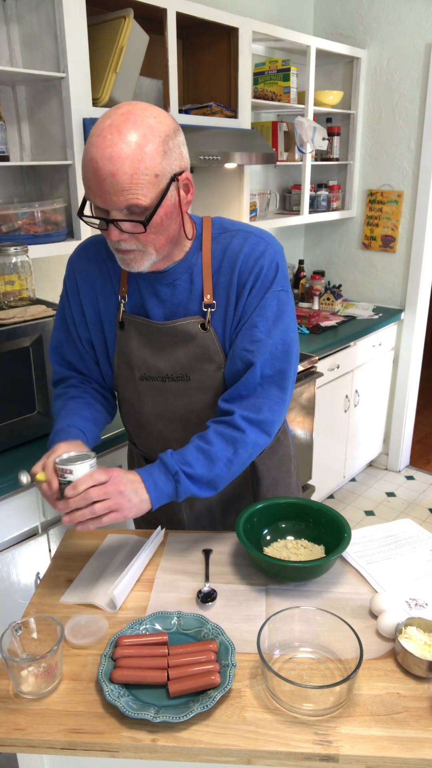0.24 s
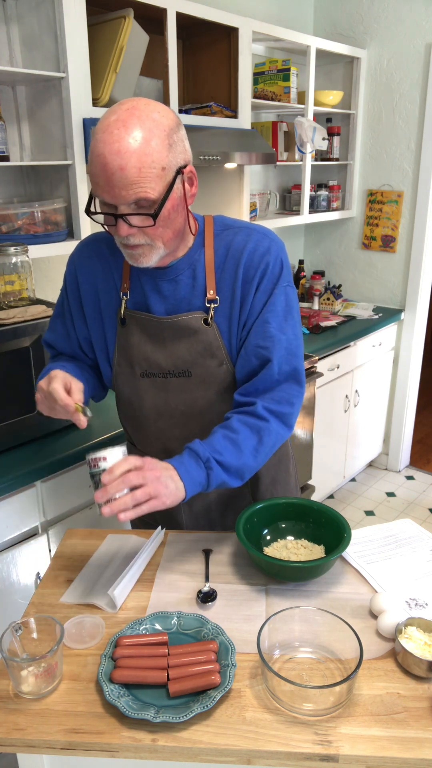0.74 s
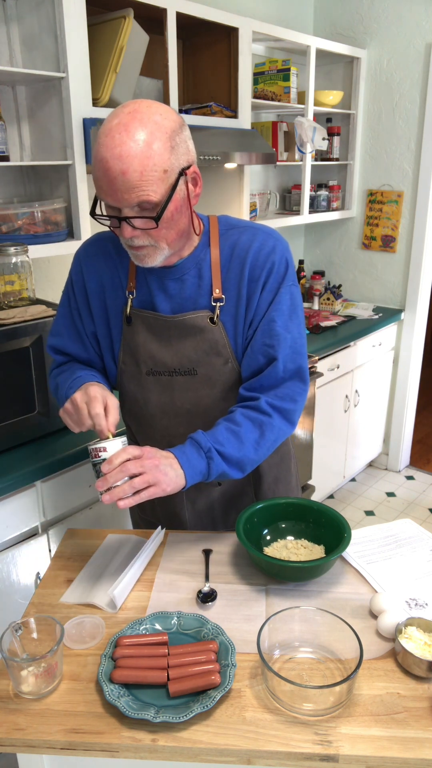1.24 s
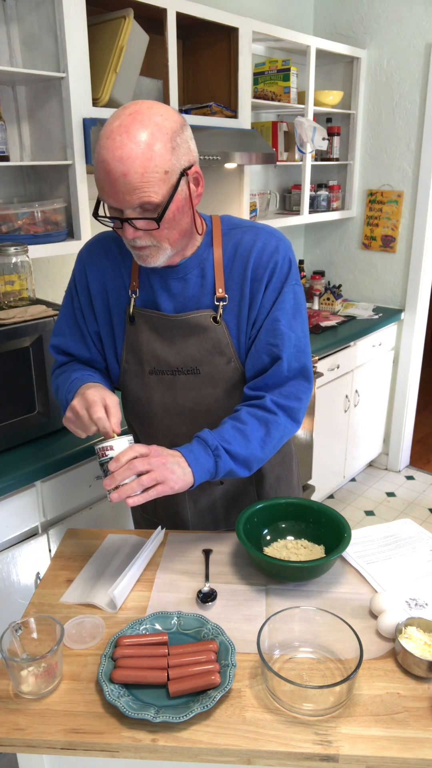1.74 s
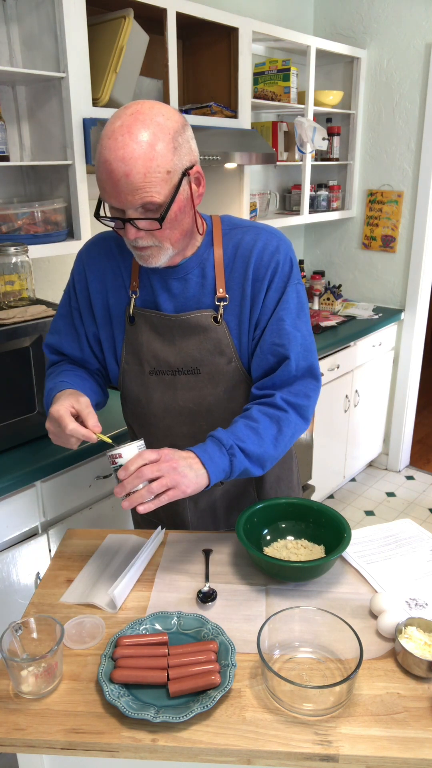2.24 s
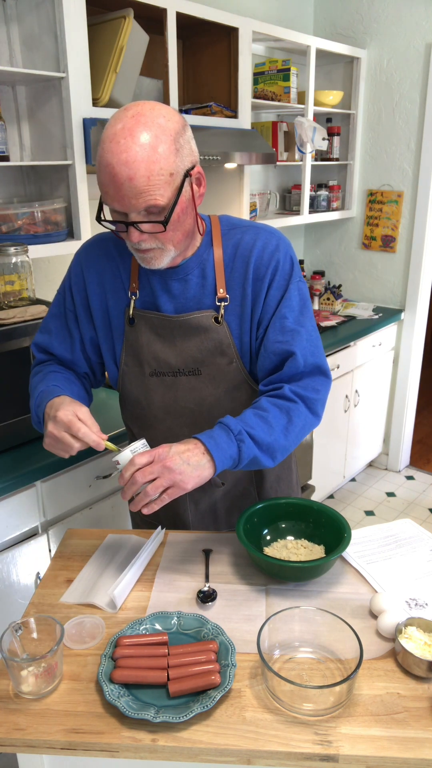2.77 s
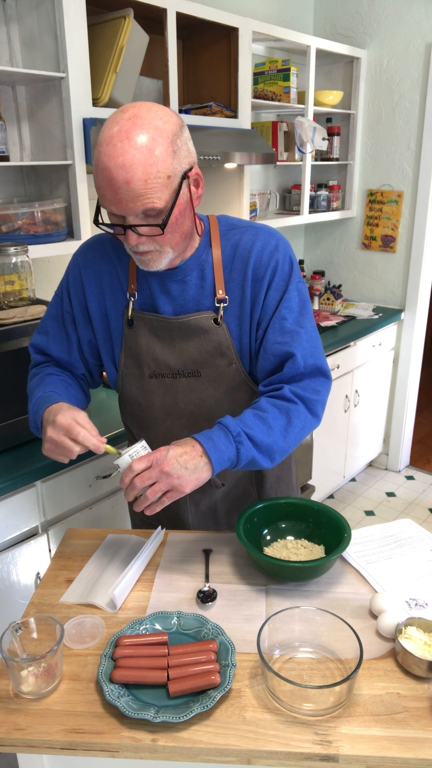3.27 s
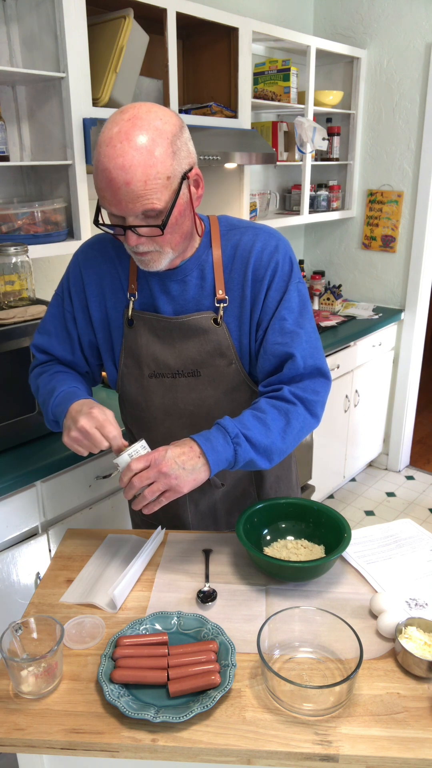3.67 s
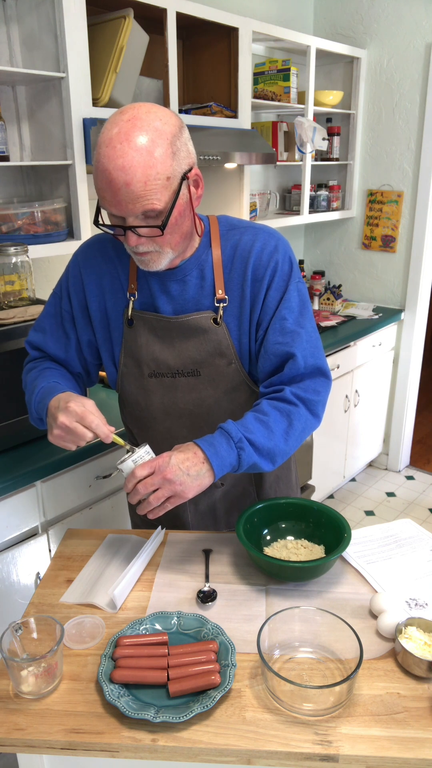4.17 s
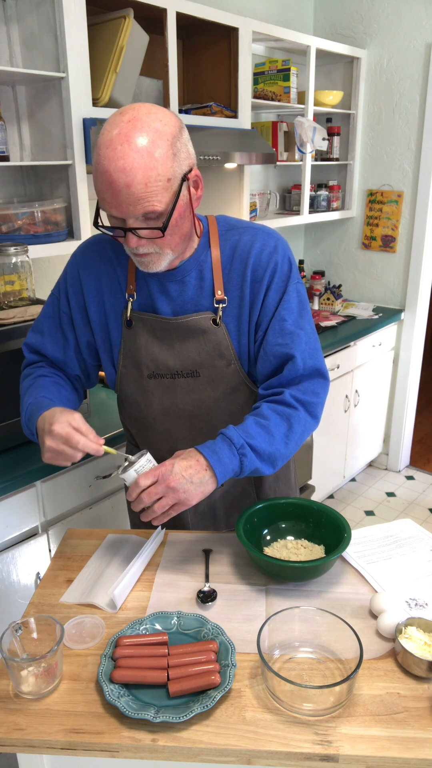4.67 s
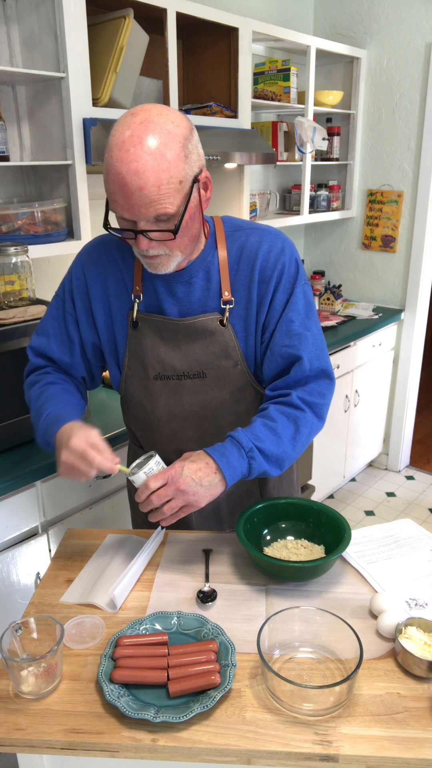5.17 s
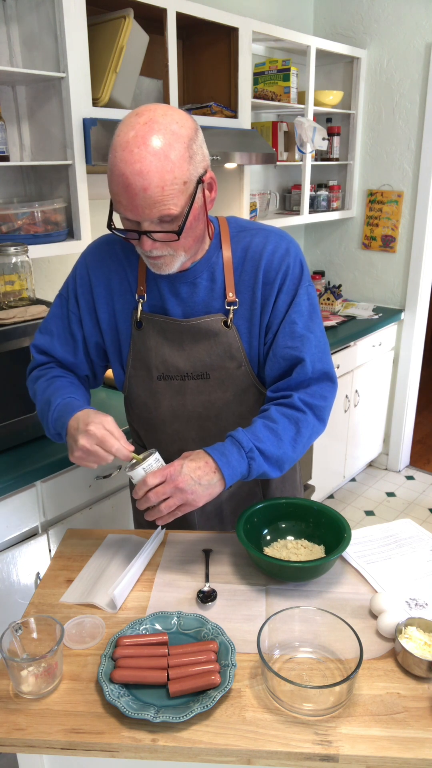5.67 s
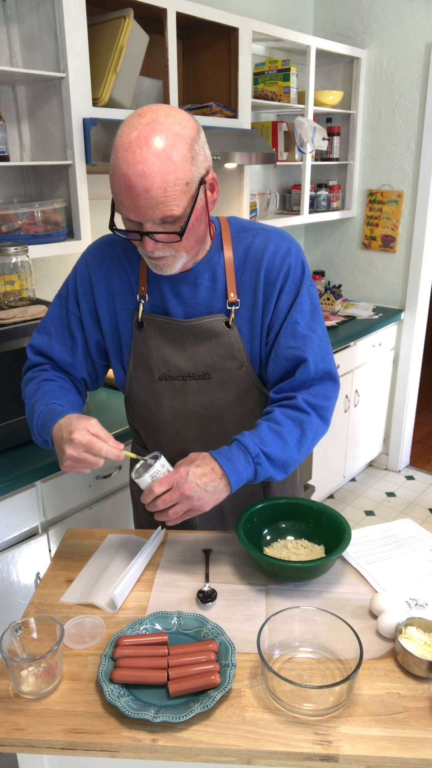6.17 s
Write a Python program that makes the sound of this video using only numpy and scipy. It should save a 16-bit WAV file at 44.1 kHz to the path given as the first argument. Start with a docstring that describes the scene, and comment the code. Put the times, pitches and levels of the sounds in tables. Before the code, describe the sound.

For the first 0.8 seconds, fingers twist the lid of a small metal can, with light rubbing and a run of little snaps. A faint tap and a soft hiss of powder follow just after 1 second. At about 1.6 seconds a measuring spoon knocks sharply on the can, the strongest click, then scrapes the bottom with a hollow tone and a brief squeak. From 2 to 3.4 seconds there is only low, steady room noise. A light tap starts more scraping and powder hiss, strongest and slightly squeaky near 3.8 seconds, then fading into faint rubs. Another sharp click comes at about 5.2 seconds, followed by taps and hollow, squeaky scrapes from 5.5 to 5.8 seconds. Soft scraping continues until about 6.4 seconds. The quiet kitchen adds a short echo throughout.

```python
"""In a quiet kitchen, fingers twist the lid of a small metal can until it lets go in little snaps.
Powder hisses as its grains shear. A measuring spoon then knocks on the can, ringing its damped modes,
and drags along the wall in tiny slips that excite the metal and the air inside, at times to a squeak.
It digs at the bottom, rubs the middle and ends at the top; the hard room reflects every sound."""
import sys
import numpy as np
from scipy import signal
from scipy.fft import rfft, irfft, next_fast_len
from scipy.io import wavfile

SR = 44100
rng = np.random.default_rng(int(sys.argv[2]) if len(sys.argv) > 2 else 0)


def to_wav(s):
    """Save 16-bit WAV."""
    ch = np.atleast_2d(s).T  # columns
    pcm = np.round(np.clip(ch, -1, 1) * 32767)  # PCM
    wavfile.write(sys.argv[1], SR, pcm.astype(np.int16))


N = 283122
TIME = np.arange(N) / SR

# Strokes of the spoon; the first row is instead a short press as the spoon settles after the first knock,
# letting the hollow note linger. Each row: part of the wall, time of full force, attack and hold in seconds,
# then relative levels in dB of the enclosed air, the wall's low band and its high band.
SPOON_STROKES = [("bottom", 1.074, 0.011, 0.0097, -54.5, -72, -64),
                 ("bottom", 1.615, .02, .025, -57, -63, -46),
                 ("bottom", 1.72, .075, .025, -29.5, -32.5, -31.5),
                 ("bottom", 1.76, .04, .018, -32.5, -31, -25), ("middle", 3.425, .01, .03, -61, -72, -58),
                 ("middle", 3.61, 0.11, .085, -59.5, -70, -65),
                 ("middle", 3.779, 0.011, 0.0469, -31, -53, -43),
                 ("middle", 3.866, 0.036, .016, -37, -54.5, -46),
                 ("middle", 3.885, .008, 0.029, -53, -45.5, -37.5),
                 ("middle", 4.016, 0.075, 0.067, -54.5, -55.5, -41),
                 ("middle", 4.13, .1, .1, -59.5, -60.5, -52.5),
                 ("middle", 4.28, 0.068, .06, -61.5, -66, -58.5), ("top", 4.64, 0.066, .04, -66, -65, -58),
                 ("top", 4.82, .04, .012, -61, -66, -57), ("top", 4.961, 0.047, .008, -46, -49, -42.5),
                 ("top", 5.0, .03, .035, -54.5, -74, -72), ("top", 5.478, 0.024, 0.0097, -45, -58, -51.5),
                 ("top", 5.585, .005, .008, -36, -49.5, -40),
                 ("top", 5.612, 0.017, 0.082, -42.5, -56, -46.5),
                 ("top", 5.728, 0.076, .008, -42.5, -46.5, -42),
                 ("top", 5.745, 0.011, 0.026, -49, -49, -35), ("top", 5.80, .03, 0.027, -53, -59, -48),
                 ("top", 5.9, .06, 0.14, -68, -66.5, -56.5), ("top", 6.1, 0.054, .014, -55.5, -59, -52),
                 ("top", 6.215, 0.13, .04, -54, -57.5, -51), ("top", 6.395, 0.014, .005, -59.5, -68, -61.5)]


def from_db(db):
    """Amplitude grows tenfold for every 20 dB."""
    return 10 ** (np.asarray(db) / 20)


def rms_one(x):
    """Normalisation to unit mean power."""
    return x / np.sqrt(np.mean(x ** 2) + 1e-20)


def at_hz(points, hz):
    """Interpolation on a logarithmic frequency axis."""
    known_hz, values = np.transpose(points)
    return np.interp(np.log(np.maximum(hz, 1)), np.log(known_hz), values)


def cut(x, hz, kind, order=2):
    """Butterworth filter: maximally flat in its passband."""
    sections = signal.butter(order, np.minimum(hz, .45 * SR), kind, fs=SR, output="sos")
    return signal.sosfilt(sections, x + 1e-18)


def colour(x, spectrum):
    """Minimum-phase filter: folding the cepstrum makes the given spectrum causal."""
    size = next_fast_len(len(x) + 4096) * 2
    gain = from_db(at_hz(spectrum, np.fft.rfftfreq(size, 1 / SR)))
    cepstrum = irfft(np.log(gain))
    cepstrum[1:size // 2] *= 2
    cepstrum[size // 2 + 1:] = 0
    return irfft(rfft(x, size) * np.exp(rfft(cepstrum)))[:len(x)]


def resonate(x, hz, width_hz):
    """Forced response of a two-pole resonator with unit peak gain."""
    radius = np.exp(-np.pi * width_hz / SR)
    feedback = [1, -2 * radius * np.cos(2 * np.pi * hz / SR), radius ** 2]
    return signal.lfilter(np.array([1, 0, -1]) * (1 - radius ** 2) / 2, feedback, x + 1e-18)


def lift(x, modes):
    """Superposition of resonances on a broad response."""
    return x + sum((from_db(db) - 1) * resonate(x, hz, width) for hz, width, db in modes)


def drift(rate_hz):
    """Random fluctuation: low-passed noise of unit rms."""
    return rms_one(cut(rng.standard_normal(N + SR), rate_hz, "low")[SR:])


def grains(per_s, spread_db, clump_db, clump_hz):
    """Stick-slip friction as a Poisson train of uneven impulses whose strength comes in clumps."""
    sizes = from_db(spread_db * np.minimum(rng.exponential(1, N), 3)) * rng.choice([-1, 1], N)
    slipping = rng.random(N) < per_s / SR
    return sizes * slipping * from_db(clump_db * drift(clump_hz))


def ring(t, hz, t60):
    """Free vibration of a damped mode from t = 0, falling 60 dB in t60 seconds."""
    t = np.maximum(t, 0)
    return np.sin(2 * np.pi * hz * t) * np.exp(-np.log(1000) * t / t60)


def swell(s, attack_s, hold_s, release_s):
    """Exponential growth and decay, 20 dB per attack or release, around a unit hold starting at s."""
    outside = np.maximum(s - TIME, 0) / attack_s + np.maximum(TIME - s - hold_s, 0) / release_s
    return from_db(-20 * np.minimum(outside, 10))


def together(gains):
    """Incoherent sources add in power."""
    return np.sqrt(sum(gain ** 2 for gain in gains))


def add(track, s, sound):
    """Superposition of a sound on the track from s seconds."""
    start = max(round(s * SR), 0)
    track[start:start + len(sound)] += sound[:N - start]


def room_tone(level_db=-57.5):
    """Stationary background noise, strongest in the bass."""
    # Each row: frequency in Hz, relative spectral density in dB.
    spectrum = [(15, -64), (25, -28), (43, -7), (74, -1), (206, -5), (249, -2), (373, -6), (489, -12.5),
                (591, -10), (775, -14.5), (1100, -13), (1190, -16.5), (1330, -16), (6920, -15),
                (16000, -32)]
    return from_db(level_db) * rms_one(colour(rng.standard_normal(N + SR), spectrum)[SR:])


def lid(rub_db=-0.5, grip_s=.83, grip_db=-56.5, click_db=-4.5, snap_s=0.0027, ring_db=1.5, ring_t60=0.029):
    """Friction of fingers on the can; the lid catches and lets go in impulses that ring its modes."""
    # The lid's broad response. Each row: frequency in Hz, gain in dB.
    spectrum = [(120, -40), (200, -9), (485, -14), (530, -3.5), (849, -11), (1220, 4), (1360, -8),
                (1810, -7), (2750, -7.5), (3540, -9.5), (4390, -13.5), (15000, -34.5)]
    # Its resonances. Each row: frequency in Hz, bandwidth in Hz, lift in dB.
    modes = [(1263, 100, 2), (2646, 94, 18.5), (2816, 57, 21.5), (4330, 120, 11)]
    # Pushes of the fingers. Each row: start and hold in seconds, relative level in dB.
    pushes = [(0, .025, -49), (0.109, 0.037, -47.5), (0.264, 0.009, -47), (0.346, 0.051, -48),
              (0.459, .06, -46.5), (.585, 0.029, -49.5), (.705, .04, -49), (.765, .04, -44.5)]
    # Snaps. Each row: start in seconds, relative level in dB, relative level of added treble in dB.
    snaps = [(0.111, -44, -32), (0.267, -46.5, -33), (0.336, -40.5, -32), (0.386, -30.5, -41),
             (0.449, -36, 11), (0.491, -33.5, 11), (0.584, -31.5, -42), (0.66, -35, -28), (0.665, -34, -2),
             (0.706, -34.5, -25), (0.73, -36, -28), (0.76, -29, -18), (0.775, -38.5, -29),
             (0.792, -33, -32)]
    slips = grains(per_s=2500, spread_db=3.5, clump_db=1.5, clump_hz=80)
    rub = lift(colour(slips, spectrum), modes[:1])
    grip = (0, grip_s, grip_db)   # the hand slides lightly until the lid is off
    pressure = together(from_db(db) * swell(s, 0.023, hold_s, 0.034) for s, hold_s, db in pushes + [grip])
    out = from_db(rub_db) * rms_one(rub) * pressure
    t = TIME[:SR // 16]
    tick = sum(from_db(db) * ring(t, hz, ring_t60) for hz, _, db in modes)
    tick /= np.abs(tick).max()
    for s, db, treble_db in snaps:
        burst = rng.standard_normal(len(t)) * np.exp(-t / snap_s)
        snap = lift(colour(burst, spectrum), modes)
        snap += from_db(treble_db + 20) * cut(snap, [4500, 9500], "band")
        snap /= np.sqrt(np.mean(snap[:SR // 500] ** 2))   # unit rms over the first 2 ms
        add(out, s, from_db(db + click_db) * (snap + from_db(ring_db) * tick))
    return out


def powder(hiss_db=5.5, flutter_db=1.0):
    """Granular shear: countless tiny contacts sum to a hiss that swells and fades with each slide."""
    # Each row: frequency in Hz, relative spectral density in dB.
    spectrum = [(1180, -19), (2000, -18), (2160, -14), (2440, -13), (3580, -0.5), (4940, -7.5),
                (6090, -1.5), (8330, -10.5), (11500, -13.5), (16000, -22)]
    # Each row: time of the peak in seconds, relative level in dB, rise and fall in seconds.
    slides = [(.2, -54, 0.088, 0.11), (1.145, -58.5, .06, .06), (1.193, -47.5, 0.025, 0.066),
              (1.404, -59.5, .03, .08), (1.59, -42, 0.0092, 0.076), (3.448, -51.5, .04, .06),
              (3.695, -50.5, .18, 0.091), (3.8, -51.5, 0.068, .1), (3.91, -56, .05, 0.14),
              (4.07, -53, 0.2, .08), (4.19, -59, 0.086, 0.26), (5.372, -56, 0.045, 0.064),
              (5.57, -50, .14, 0.099), (5.74, -58, .15, .15), (5.836, -55, .03, 0.076), (6.08, -61, .2, .1)]
    hiss = colour(rng.standard_normal(N) * from_db(flutter_db * drift(90)), spectrum)
    flow = together(from_db(db) * swell(s, rise_s, 0, fall_s) for s, db, rise_s, fall_s in slides)
    return from_db(hiss_db) * rms_one(hiss) * flow


def knocks(bounce_s=0.001253, crack_db=-5.0, crack_s=0.0014, buzz_db=-18.0, buzz_s=0.0097,
           hollow_hz=850, hollow_t60=0.082, thud_t60=0.021):
    """Impact excites the modes near its contact pitch, bounces once, and stirs the air and held body."""
    # Each row: start in seconds, relative metal level in dB, contact pitch in Hz, its spread in octaves,
    # relative levels of bounce, hollow note and thud in dB, thud frequency in Hz.
    impacts = [(1.066, -32, 4000, 0.22, -14, -52, -30.5, 316),
               (1.579, -6.3, 2850, 1.1, -32, -51, -36.5, 404),
               (3.407, -30.5, 3050, 0.31, 8, -45.5, -37.5, 534),
               (3.882, -40, 2993, 0.91, -6, -33.5, -61, 454), (5.077, -44, 4170, 0.16, -8, -66, -68, 450),
               (5.1821, -16, 5300, 0.39, 11, -34.5, -51, 400),
               (5.1834, -21.5, 1350, 0.53, -18, -64, -52, 410),
               (5.348, -36, 3700, 1.55, -25, -45.5, -41.5, 523),
               (5.582, -26.5, 3408, 0.55, 6, -27.5, -40, 407), (5.738, -27, 4450, 0.43, 0, -43, -56, 398.4),
               (5.739, -25.5, 1360, .3, -7, -42, -70, 406)]
    # Modes of the hand-damped can. Each row: frequency in Hz, relative level in dB, t60 in seconds.
    modes = [(1373, 5.5, 0.012), (1830, -3, 0.011), (2540, 8, 0.0045), (3085, -20, 0.0033), (3590, 2, .014),
             (3680, 0.5, 0.025), (3700, -35, 0.013), (4560, -4.5, 0.014), (5490, -4, 0.017),
             (5630, -25, 0.029), (6500, -14, 0.014), (7400, -31, .012), (7500, -27, 0.011),
             (8100, -15, .014), (9800, -23, .008), (11000, -21, 0.016)]
    out, t = np.zeros(N), TIME[:SR // 4]
    # a crack at the touch, then a short buzz while the spoon settles
    contact = from_db(crack_db) * np.exp(-t / crack_s) + from_db(buzz_db) * np.exp(-t / buzz_s)
    for s, db, contact_hz, octaves, bounce_db, hollow_db, thud_db, thud_hz in impacts:
        metal = np.zeros(len(t))
        for hz, mode_db, t60 in modes:
            weight = from_db(mode_db) / (1 + (np.log2(hz / contact_hz) / octaves) ** 2)
            metal += weight * (ring(t, hz, t60) + from_db(bounce_db) * ring(t - bounce_s, hz, t60))
        noise = rms_one(resonate(rng.standard_normal(len(t)), contact_hz, contact_hz * octaves))
        metal = metal / np.abs(metal).max() + contact * noise
        metal = cut(metal, 700, "high")   # a small can radiates little bass
        metal = cut(metal, 2.99 * contact_hz, "low", order=4)   # the contact time limits the treble
        air = from_db(hollow_db) * ring(t, hollow_hz, hollow_t60)
        thud = from_db(thud_db) * ring(t, thud_hz, thud_t60)
        add(out, s, from_db(db) * metal + cut(air + thud, 203, "high"))
    return out


def scrape(spot, low_db, high_db, split_hz=2450, release_s=.04):
    """Stick-slip friction of the spoon drives wall resonances that depend on the grip and the spot."""
    # The wall's broad response. Each row: frequency in Hz, gain in dB.
    spectrum = [(290, -44), (500, -17), (665, -12), (847, 2), (962, -5.5), (1430, -10), (1560, -16.5),
                (1990, -13.5), (2460, -15.5), (3000, -16), (6300, -19), (15000, -51)]
    # Resonances at three spots. Each row: frequency in Hz, bandwidth in Hz, lift in dB.
    bottom_modes = [(1730, 100, 14.5), (2014, 41, 15.5), (2190, 23, 12), (2626, 26, 2), (2898, 33, 8.5),
                    (3080, 59, 9), (3470, 59, 8), (3665, 170, 7), (4530, 30, 9), (5850, 80, 5),
                    (6400, 80, 6)]
    middle_modes = [(1340, 94, 3), (2840, 160, 7), (3680, 120, 6), (3960, 150, 16), (4420, 260, 8.8),
                    (5074, 260, 16.7), (5900, 120, 3.8), (9500, 200, 9), (11400, 310, 11)]
    top_modes = [(1413, 50, 3.8), (1830, 260, -7), (2830, 160, 6), (3490, 100, 7.5), (3930, 78.4, 8.4),
                 (5270, 200, 8.4), (5915, 59, 3.5), (6200, 140, 3.8), (9500, 200, 10), (11500, 310, 11.5)]
    modes = {"bottom": bottom_modes, "middle": middle_modes, "top": top_modes}[spot]
    slips = grains(per_s=5400, spread_db=3.5, clump_db=0.96, clump_hz=130)
    wall = lift(colour(slips, spectrum), modes)
    low = rms_one(cut(cut(wall, 1210, "high", order=6), split_hz, "low", order=4))
    high = rms_one(cut(wall, split_hz, "high", order=4))
    low_gain, high_gain = together(
        from_db(bands_db)[:, None] * swell(s, attack_s, hold_s, release_s)
        for where, s, attack_s, hold_s, _, *bands_db in SPOON_STROKES if where == spot)
    return from_db(low_db) * low * low_gain + from_db(high_db) * high * high_gain


def judder(depth, rate_hz=68, uneven=0.2953):
    """Amplitude modulation: the springy handle presses the spoon's bowl harder and softer."""
    phase = 2 * np.pi * np.cumsum(rate_hz * (1 + uneven * drift(38.1))) / SR
    return rms_one(1 + depth * np.sin(phase))


def hollow_air(rest_hz=876, sag_hz=60.1, waver=0.02206, flicker_db=1.5, climb_hz=205,
               grit_db=-15.0, grit_width_hz=450, air_db=0.9, release_s=0.03004):
    """Cavity resonance: the dragging spoon sustains the can's hollow note, with rasp and grit around it."""
    # The loaded spoon is drawn up the wall. Each row: start and length in seconds.
    draws = [(3.772, .115), (5.58, .15)]
    force = together(from_db(db) * swell(s, .6 * attack_s, hold_s, release_s)
                     for _, s, attack_s, hold_s, db, _, _ in SPOON_STROKES)
    note_hz = rest_hz - sag_hz * (force / force.max()) ** 2   # hard pressure flattens the note
    rasp_hz, rasp_db = note_hz + 24, -3   # just above the note and a little weaker
    for s, length_s in draws:   # each draw starts clean, then the rasp grows and climbs
        times = [s - release_s, s, s + length_s, s + length_s + release_s]
        rasp_hz += climb_hz * np.interp(TIME, times, [0, 0, 1, 0])
        rasp_db += np.interp(TIME, times, [0, -13, 3, 0])
    note = np.sin(2 * np.pi * np.cumsum(note_hz * (1 + waver * drift(74))) / SR)
    note = rms_one(note * judder(depth=0.49) * from_db(flicker_db * drift(84)))
    rasp_phase = 2 * np.pi * np.cumsum(rasp_hz) / SR
    rasp = drift(70) * np.sin(rasp_phase) + drift(70) * np.cos(rasp_phase)   # narrow-band noise
    grit = resonate(rng.standard_normal(N), rest_hz, grit_width_hz)
    grit = rms_one(resonate(grit, rest_hz, grit_width_hz))
    air = (note + from_db(rasp_db) * rasp) / np.hypot(1, from_db(rasp_db))   # constant power
    air += from_db(grit_db) * grit
    return from_db(air_db) * cut(air, 665, "high", order=4) * force


def squeaks(waver=0.017, flicker_db=4.0, edge_s=0.017):
    """Self-excited vibration: slips lock onto a wall mode, which sings with unsteady pitch and strength."""
    # Each row: start and end in seconds, frequency in Hz, relative level in dB.
    locked_modes = [(1.642, 1.668, 2714, -39.5), (1.727, 1.775, 1990, -35.5), (3.775, 3.825, 3940, -45.5),
                    (3.776, 3.837, 3490, -46), (3.78, 3.813, 5830, -43.5), (3.78, 3.927, 2763, -45.5),
                    (3.788, 3.855, 2090, -49), (3.885, 3.924, 3130, -44), (5.58, 5.686, 3930, -46.5),
                    (5.584, 5.633, 3490, -46.5), (5.64, 5.72, 2890, -48), (5.745, 5.762, 1401, -43.5),
                    (5.767, 5.827, 3550, -46)]
    out = np.zeros(N)
    for start, end, hz, db in locked_modes:
        phase = 2 * np.pi * np.cumsum(hz * (1 + waver * drift(197.2))) / SR
        out += from_db(db) * np.sin(phase) * swell(start, edge_s, end - start, edge_s)
    return from_db(flicker_db * drift(260)) * judder(depth=0.37) * out


def kitchen(x, first_echo_s=0.0047, build_s=0.00082, dull_hz=9500):
    """Reverberation: dense reflections from table and cupboards decay exponentially, octave by octave."""
    # Each row: frequency in Hz, reverberation time in seconds.
    decay_times = [(200, 0.38), (900, 0.38), (3000, 0.4), (6000, 0.42), (14000, 0.37)]
    t, echoes = TIME[:SR * 3 // 4], 0
    edges_hz = np.geomspace(125, 16000, 8)
    for low, high in zip(edges_hz, edges_hz[1:]):
        band = cut(rng.standard_normal(len(t)), [low, high], "band", order=3)
        t60 = at_hz(decay_times, np.sqrt(low * high))
        echoes += band * np.exp(-np.log(1000) * t / t60)
    echoes *= 1 - np.exp(-np.maximum(t - first_echo_s, 0) / build_s)
    echoes /= np.sqrt(np.sum(echoes ** 2))   # unit energy
    return signal.fftconvolve(x, cut(echoes, dull_hz, "low", order=1))[:N]


def scene():
    """Superposition of the direct sounds, their reverberation and the room tone."""
    hits, air = knocks(), hollow_air()
    friction = lid() + powder() + squeaks()
    friction += scrape("bottom", low_db=-0.5, high_db=-2.5)
    friction += scrape("middle", low_db=3.5, high_db=-1.5)
    friction += scrape("top", low_db=-0.5, high_db=-1.0)
    reflections = kitchen(from_db(-6.5) * hits + from_db(-7.5) * friction + from_db(-9.0) * air)
    return (hits + air + friction + reflections + room_tone())[None]


def record(dry):
    """Band limiting removes the deepest rumble and the highest treble."""
    return cut(cut(dry, 32, "high"), 15900, "low", order=24)


dry = scene()
out = record(dry)
to_wav(out)
```